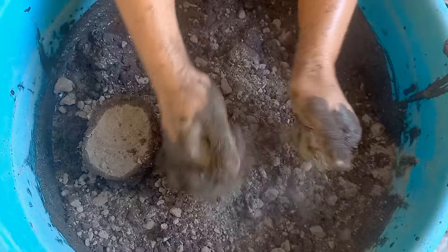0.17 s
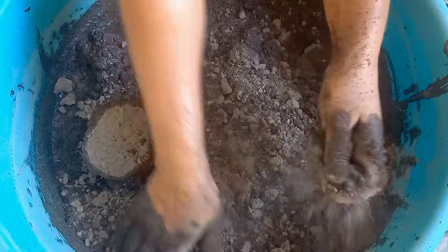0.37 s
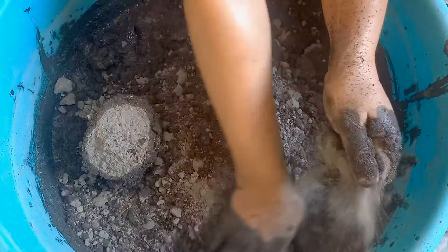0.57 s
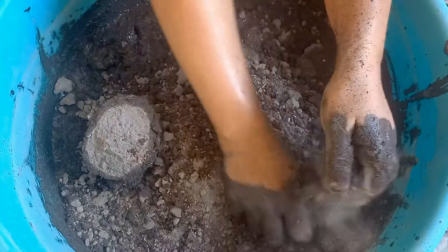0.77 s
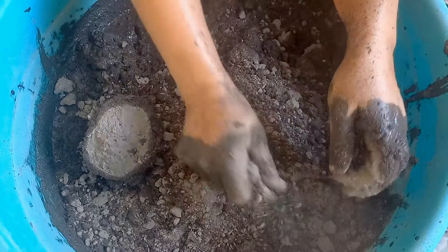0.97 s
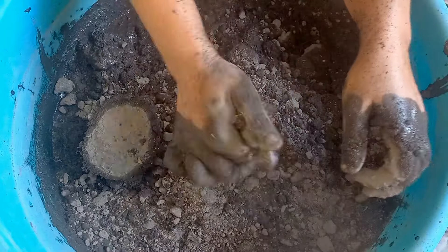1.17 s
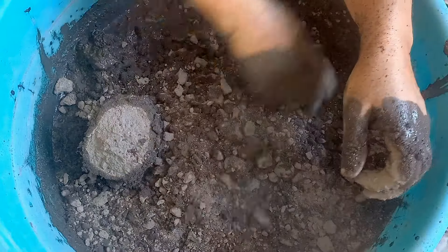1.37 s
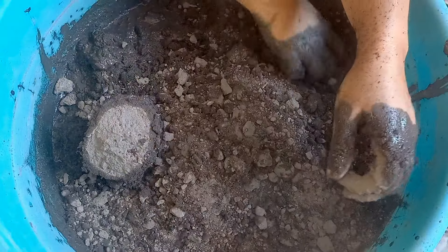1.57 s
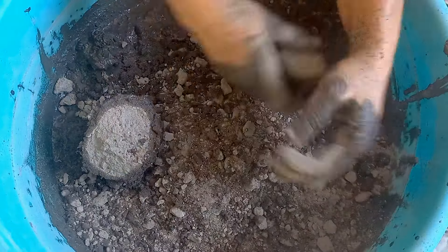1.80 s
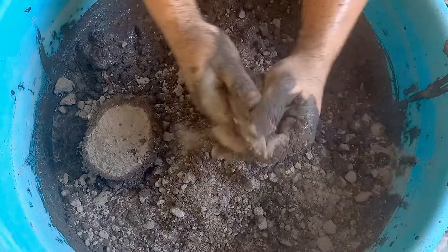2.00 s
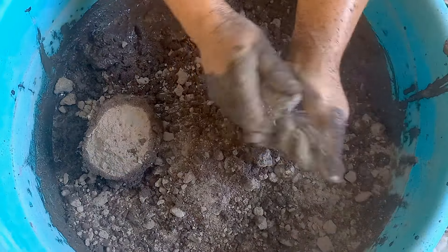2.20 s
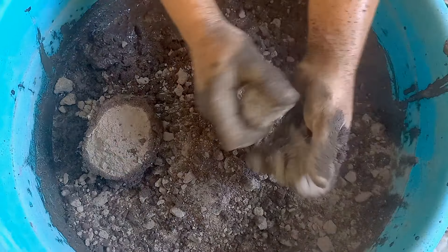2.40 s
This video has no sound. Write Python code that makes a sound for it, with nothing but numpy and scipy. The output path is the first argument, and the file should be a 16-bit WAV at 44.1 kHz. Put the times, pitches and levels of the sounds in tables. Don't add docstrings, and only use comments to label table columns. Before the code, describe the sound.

Close, dry mono sound of charcoal crushed by hand: coarse grinding first, a booming, overloaded drag along the tub wall, a hard crack and ping, then crisp crumbling, a near lull, and a few late snaps.

```python
import sys
import numpy as np
from scipy import signal
from scipy.io import wavfile

SR = 44100
rng = np.random.default_rng(int(sys.argv[2]) if len(sys.argv) > 2 else 0)


def wrap_up_sound(samples):
    columns = np.atleast_2d(samples).T
    tamed = np.clip(columns, -1, 1)
    steps = np.round(tamed * 32767).astype(np.int16)
    wavfile.write(sys.argv[1], SR, steps)


N = 108045


def from_db(db):
    return 10 ** (np.asarray(db) / 20)


def rms_one(x):
    return x / np.sqrt(np.mean(x ** 2) + 1e-20)


def in_time(rows):
    s, *columns = np.transpose(rows)
    t = np.arange(N) / SR
    return [np.interp(t, s, column, left=-200, right=-200) for column in columns]


def drift(rate_hz):
    r = np.exp(-2 * np.pi * rate_hz / SR)
    slow = signal.lfilter([1], [1, -2 * r, r * r], rng.standard_normal(N + SR))
    return rms_one(slow[SR:])


def grains(per_s, spread, size=N):
    chance, height, side = rng.random((3, size))
    happens = chance < per_s / SR
    level_db = spread * np.minimum(-np.log(height + 1e-9), 5)
    return happens * from_db(level_db) * np.sign(side - 0.5)


def butter(x, order, hz, kind):
    return signal.sosfilt(signal.butter(order, hz, kind, fs=SR, output="sos"), x)


def peak(x, hz, width):
    r = np.exp(-np.pi * width / SR)
    turn = 2 * np.pi * min(hz, SR * 0.45) / SR
    return signal.lfilter([(1 - r * r) / 2, 0, (r * r - 1) / 2], [1, -2 * r * np.cos(turn), r * r], x + 1e-18)


def body(x, resonances):
    modes = [(-1) ** k * from_db(db) * peak(x, hz, width) for k, (hz, width, db) in enumerate(resonances)]
    return rms_one(sum(modes))


def colour(source, spectrum, patchy_db):
    hz, db = np.transpose(spectrum)
    edges = np.geomspace(hz[0], min(hz[-1], SR * 0.45), 19)
    pool = [source(), source(), source()]
    out = 0
    for k, (low, high) in enumerate(zip(edges, edges[1:])):
        band = butter(pool[0] + pool[1 + k % 2], 2, [low, high], "band")
        band_db = np.interp(np.log(low * high) / 2, np.log(hz), db)
        out = out + band * from_db(band_db + patchy_db * drift(18.0))
    return rms_one(out)


def add(out, s, x):
    i = int(s * SR)
    out[i:i + len(x)] += x[:N - i]


def still_air():
    # frequency in Hz, density in dB per Hz.
    air_tone = [(48, -36), (75, -10), (100, -4), (150, -7.5), (380, -19.5), (900, -76), (3000, -27),
                (16000, -33.5)]
    return from_db(-46) * colour(lambda: rng.standard_normal(N), air_tone, patchy_db=3.5)


def basin():
    # time in seconds, level in dB.
    bed_rows = [(0, -32), (.16, -34.5), (.27, -39), (.35, -39), (.8, -35.5), (.87, -43.5), (.97, -44),
                (1.13, -40), (1.26, -41), (1.46, -56), (1.49, -36), (1.6, -32), (1.68, -39.5), (2.0, -41.5),
                (2.2, -37), (2.3, -44), (2.45, -63)]
    # frequency in Hz, width in Hz, level in dB.
    floor_modes = [(91, 45, -8), (203, 40, -13.5), (372, 99, -2.5), (496, 70, -0.5), (595, 64.5, -1.5)]
    hum = body(grains(1500, spread=1.45), floor_modes)
    hum = butter(hum, 4, 700, "low")
    level = in_time(bed_rows)[0]
    return from_db(level + 1.2 * drift(9.6)) * hum


def grit():
    # time in seconds, level in dB, fine dust in dB, coarse crumbs in dB.
    grit_rows = [(0, -30, -8, -11), (.15, -36, -3.5, -6.5), (.24, -45.5, -8, -11), (.36, -49.5, 1, 7),
                 (.73, -42.5, -2, 1.5), (.86, -33, -11, -13), (.98, -41, -3.5, -9), (1.15, -37, -5, -6),
                 (1.2, -51.5, -1.5, -3), (1.455, -60, 2, 0.5), (1.485, -44, -8, -4.5),
                 (1.6, -35.5, -8, -4.5), (1.68, -54, -12, -4), (1.99, -57, 7, -15), (2.06, -45, -5, -42),
                 (2.23, -44.5, -7.5, -13), (2.3, -50, 0.5, 2), (2.45, -54, 2, -7)]
    # frequency in Hz, density in dB per Hz.
    grit_tone = [(1300, -9.5), (1700, -1.5), (2500, -1.5), (4500, -3.5), (6500, -8.5), (8500, -18.5),
                 (16000, -35)]
    level, dust_db, coarse_db = in_time(grit_rows)
    clumps = from_db(level + 1.15 * drift(36))

    def fractures():
        return grains(5000, spread=2.4) + 3.1 * grains(140, spread=2.3)

    crunch = colour(fractures, grit_tone, patchy_db=2.5)
    dust = rms_one(butter(grains(12000, spread=4.0), 4, 8500, "high"))
    coarse = rms_one(butter(grains(2000, spread=2.9), 2, [700, 1450], "band"))
    return clumps * (crunch + from_db(dust_db) * dust + from_db(coarse_db) * coarse)


def ticks():
    # time in seconds, peak level in dB, centre in Hz.
    tick_rows = [(0.0037, -14, 3100), (0.0485, -21, 4100), (0.0547, -15, 4500), (0.061, -15, 4000),
                 (0.102, -16, 3300), (0.1338, -18, 4100), (0.1625, -6, 7400), (0.1817, -24, 3900),
                 (0.229, -29, 4000), (0.2992, -31, 3800), (0.312, -30, 5200), (0.3262, -24, 8300),
                 (0.3376, -28, 5900), (0.3396, -26, 9000), (0.3465, -12, 7100), (0.3588, -24, 3900),
                 (0.3624, -20, 5200), (0.7298, -17, 3800), (0.7358, -18, 3200), (0.845, -16, 3100),
                 (0.8596, -19, 3700), (0.8912, -18, 3800), (0.9049, -14, 3600), (0.9071, -11, 3100),
                 (0.9093, -8, 3400), (0.9127, -12, 3400), (0.9307, -15, 3400), (0.9432, -1, 3400),
                 (0.9467, -6, 3300), (1.0157, -24, 6500), (1.0858, -15, 5900), (1.0976, -26, 8700),
                 (1.1077, -17, 3100), (1.1241, -23, 5500), (1.1702, -17, 8500), (1.2214, -30, 10100),
                 (1.2954, -25, 4600), (1.3228, -28, 6100), (1.3636, -28, 8200), (1.3995, -28, 11000),
                 (1.4208, -36, 5900), (1.7788, -31, 8300), (2.1176, -27, 7300), (2.1732, -15, 3600),
                 (2.1755, -14, 3000), (2.2619, -26, 5600), (2.2725, -24, 6200), (2.2767, -25, 7400),
                 (2.2855, -21, 6000), (2.2914, -33, 7200), (2.2999, -32, 6800), (2.3057, -29, 6700),
                 (2.3096, -26, 4900), (2.3133, -27, 6400), (2.3293, -32, 9100), (2.3347, -7, 4300),
                 (2.3373, -17, 3300), (2.4044, -33, 6100), (2.4396, -12, 7000), (2.4482, -14, 6000)]
    swings, knock_share, trim_db = 0.39, 0.11, 2.3
    out, t = np.zeros(N), np.arange(-32, 224) / SR
    turns = rng.uniform(0, 2 * np.pi, len(tick_rows))
    for (s, db, hz), turn in zip(tick_rows, turns):
        snap = np.cos(2 * np.pi * hz * t + turn) * np.exp(-(t * hz / swings) ** 2)
        knock = np.sin(2 * np.pi * hz / 2.35 * t) * np.exp(-t * hz / 1.4) * (t > 0)
        add(out, s + t[0], from_db(db + trim_db) * (snap + knock_share * knock))
    return out


def cracks():
    # time in seconds, peak level in dB, centre in Hz, length in seconds.
    crack_rows = [(.003, -19, 3200, .006), (.0595, -17, 4600, .004), (.1, -20, 2600, .005),
                  (.1122, -19, 1600, .002), (.1325, -21, 3500, .003), (.1628, -13, 4500, .004),
                  (.6995, -7, 5000, .013), (.8435, -18, 3000, .02), (.889, -21, 3800, .006),
                  (.9045, -14, 3200, .012), (.9435, -16, 3000, .008), (1.06, -24, 1800, .005),
                  (1.083, -17, 2200, .005), (1.083, -24, 13000, .005), (1.148, -24, 1600, .005),
                  (1.255, -31, 4500, .014), (1.277, -33, 3500, .008), (1.295, -26, 2800, .01),
                  (1.331, -33, 4000, .003), (1.338, -34, 3000, .002), (1.405, -33, 4500, .004),
                  (2.172, -15, 3000, .03), (2.178, -16, 2300, .035), (2.172, -23, 11000, .05),
                  (2.2685, -23, 1300, .004), (2.336, -22, 3000, .007)]
    out, t = np.zeros(N), np.arange(4096) / SR
    for s, db, hz, length in crack_rows:
        dying = np.exp(-(t / max(length, 1e-4)) ** 2 * 1.27)
        run = grains(5000, spread=2.23, size=len(t)) * dying
        run[0] = 1.5
        x = peak(run, hz, 0.52 * hz) + 0.71 * peak(run, hz, 0.16 * hz)
        x = x + 0.16 * np.diff(run, prepend=0)
        x = x + 1.05 * peak(run, 0.13 * hz, hz / 2)
        add(out, s, from_db(db) * x / np.abs(x).max())
    return out


def thuds():
    # time in seconds, peak level in dB, pitch in Hz, 60 dB decay in seconds.
    thud_rows = [(.162, -22, 920, .026), (.2, -13, 233, .021), (.203, -18, 782, .023),
                 (.304, -23, 490, .016), (.312, -19, 158, .036), (.3765, -1.5, 850, .047),
                 (.392, -1, 871, .038), (.396, -10, 1500, .04), (.4, -22, 75, .051), (.411, 0, 900, .017),
                 (.441, -3, 1015, .033), (.484, -3, 800, .025), (.495, -3, 866, .03), (.528, -16, 91, .077),
                 (.553, -12, 1500, .025), (.566, -9, 980, .04), (.586, -10, 930, .05),
                 (.6652, 1.5, 930, .017), (.695, -14, 200, .022), (.729, -15.5, 1450, .022),
                 (.733, -20, 620, .035), (.736, -17, 1390, .022), (.761, -19, 850, .035),
                 (.762, -17, 212, .033), (.844, -18, 525, .12), (.943, -11, 1405, .04),
                 (.946, -19, 1050, .02), (.946, -18, 560, .03), (.947, -21, 215, .03),
                 (1.181, -23, 527, .012), (1.198, -16.5, 550, .033), (1.206, -28, 88, .09),
                 (2.169, -15, 324, .013), (2.175, -31, 80, .074), (2.175, -18, 2900, .02),
                 (2.181, -19, 480, .04), (2.182, -18, 2300, .02), (2.19, -18, 1850, .02),
                 (2.199, -23, 2050, .035), (2.214, -24, 2050, .02), (2.27, -26, 750, .02),
                 (2.335, -20, 1560, .014), (2.336, -23, 880, .02), (2.338, -25, 545, .02)]
    out, t = np.zeros(N), np.arange(8192) / SR
    for s, db, hz, t60 in thud_rows:
        swing = np.sin(2 * np.pi * hz * t)
        swing = swing + 0.066 * np.sin(2 * np.pi * hz * 1.35 * t + rng.uniform(0, 5.7))
        puff = peak(peak(rng.standard_normal(len(t)), hz, 0.57 * hz), hz, 1.55 * hz)
        swing = swing + 0.46 * rms_one(puff)
        contact = (1 - np.exp(-t * hz * 2.0)) ** 2
        x = swing * from_db(-60 * t / t60) * contact
        add(out, s, from_db(db) * x / np.abs(x).max())
    return out


def sweep():
    # time in seconds, level in dB, rasp in dB.
    sweep_rows = [
        (.343, -29.5, -22),
        (.375, -26.5, -15),
        (.379, -12, -14.5),
        (.408, -15.5, -13.5),
        (.434, -19.5, -12),
        (.486, -8, -11.5),
        (.52, -15, -8.5),
        (.691, -15, -10),
        (.706, -31.5, 7),
    ]
    # frequency in Hz, width in Hz, level in dB.
    wall_modes = [(85, 110, -10), (147, 39, -5), (240, 78, -5), (382, 96, -4), (486, 130, -2.5),
                  (878, 136, -1), (1040, 167, -4.5), (1486, 160, -8.5)]
    # frequency in Hz, density in dB per Hz.
    rasp_tone = [(1200, -8.5), (2000, -6.5), (3500, -11), (6000, -12.5), (8000, -18), (16000, -16)]
    level, rasp_db = in_time(sweep_rows)
    jerks = from_db(level + 1.74 * drift(34))
    roar = body(grains(1200, spread=1.5), wall_modes)
    roar = butter(roar, 2, 1800, "low")
    rasp = colour(lambda: grains(6500, spread=2.3), rasp_tone, patchy_db=-2.0)
    return jerks * (roar + from_db(rasp_db) * rasp)


def ping():
    # frequency in Hz, level in dB, 60 dB decay in seconds.
    shard_modes = [(3737, -23, .12), (10153, -13, .06), (10600, -17, .06), (10480, -35, .35),
                   (10620, -36, .35)]
    out, t = np.zeros(N), np.arange(SR // 4) / SR
    x = 0
    for hz, db, t60 in shard_modes:
        ring = np.sin(2 * np.pi * hz * t + 0.6 * drift(60)[:len(t)])
        x = x + from_db(db - 60 * t / t60) * ring * (1 + 0.25 * drift(120)[:len(t)])
    strike = rng.standard_normal(len(t)) * np.exp(-t / 0.0011)
    x = x + 1.8 * peak(strike, 13300, 2400)
    add(out, 0.7062, x)
    return out


def scene():
    background = still_air() + basin()
    crumbling = grit() + ticks() + cracks() + thuds()
    return (background + crumbling + sweep() + ping())[None]


def top_cut(x):
    return signal.sosfilt(signal.butter(12, 16630, fs=SR, output="sos"), x)


def record(dry):
    x = butter(dry, 3, 62, "high")
    x = signal.sosfilt(signal.cheby2(12, 30, 16100, fs=SR, output="sos"), x)
    mix = np.clip(x, -1, 1)
    return top_cut(mix)


dry = scene()
out = record(dry)
wrap_up_sound(out)
```